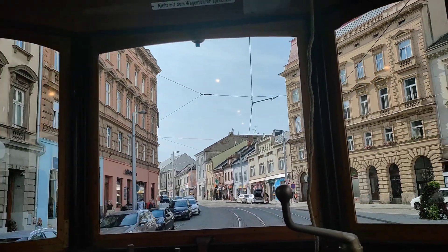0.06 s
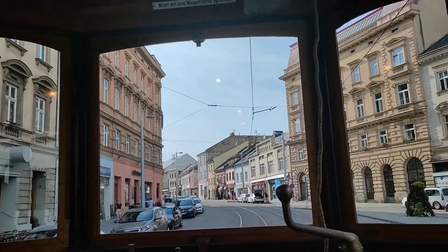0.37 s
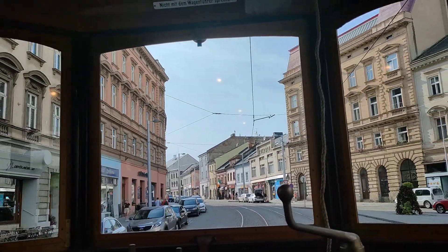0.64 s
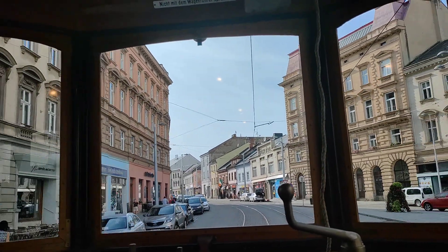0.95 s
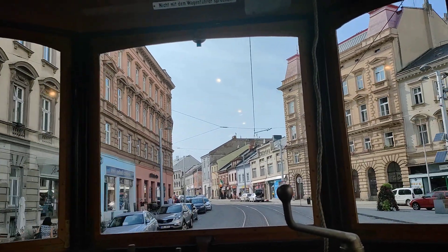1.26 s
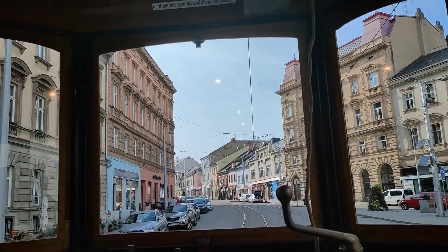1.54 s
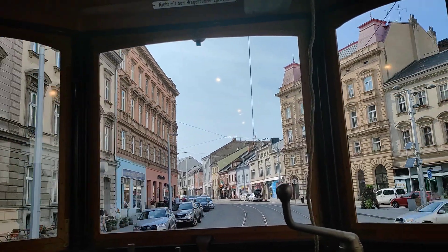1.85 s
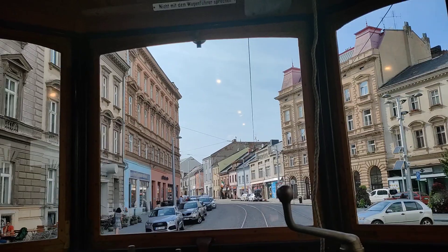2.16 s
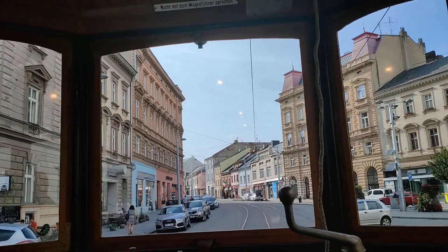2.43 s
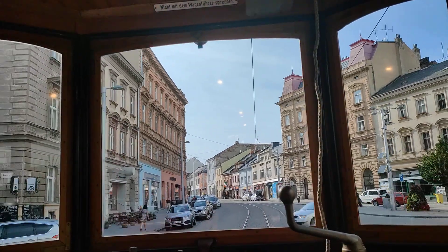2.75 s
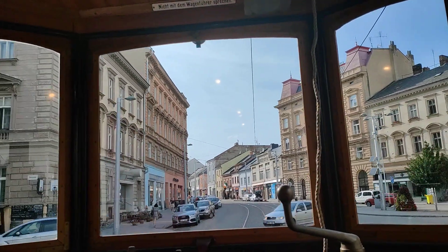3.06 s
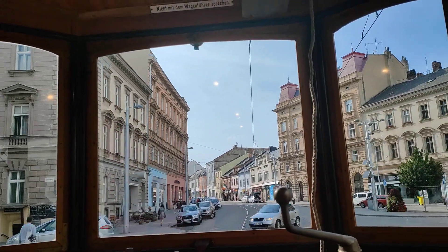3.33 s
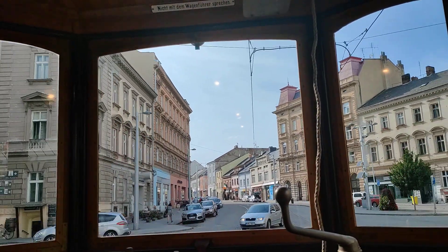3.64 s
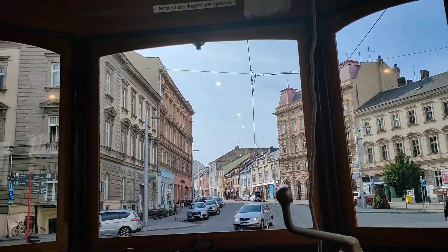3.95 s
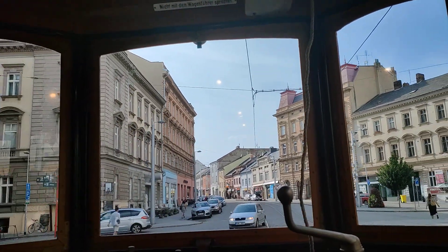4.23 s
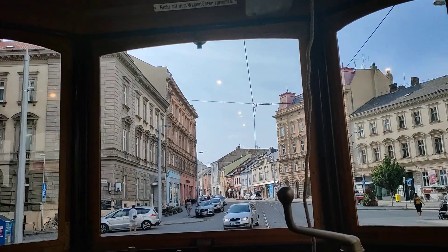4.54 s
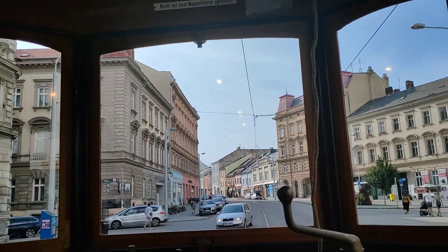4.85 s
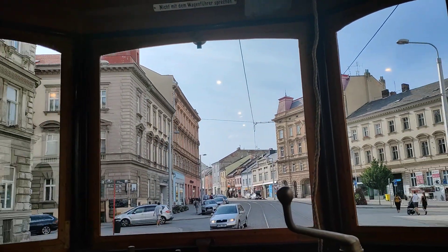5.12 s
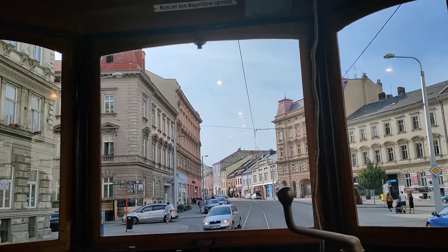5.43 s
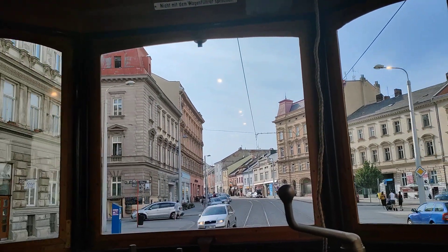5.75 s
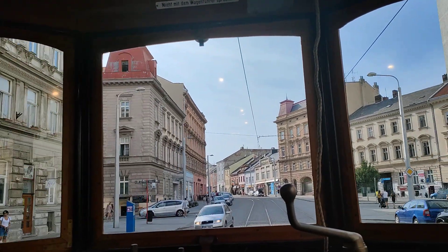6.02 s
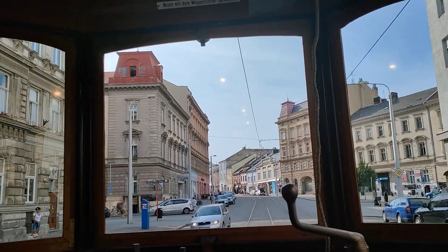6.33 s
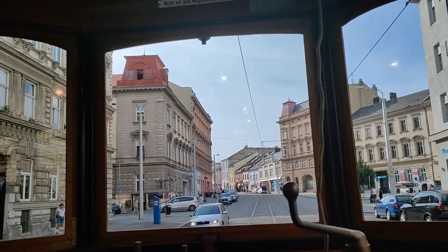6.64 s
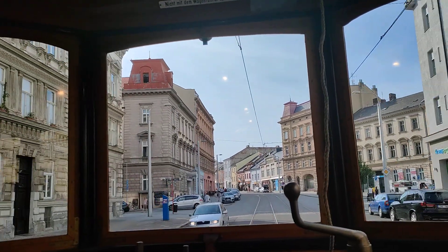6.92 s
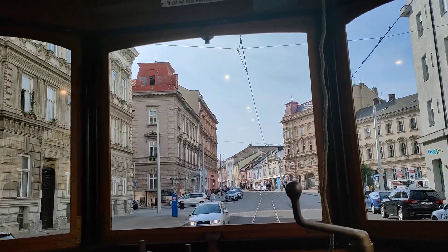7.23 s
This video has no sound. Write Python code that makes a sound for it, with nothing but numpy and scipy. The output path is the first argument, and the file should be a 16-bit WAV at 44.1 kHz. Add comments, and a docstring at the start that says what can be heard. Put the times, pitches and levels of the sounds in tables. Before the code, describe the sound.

Inside a moving tram, low wheel rumble and thumps run under rattling fittings, while a gear hum turns into whining chatter.

```python
"""Rumbling wheels, a booming body and humming gears: an old wooden tram on street rails, from the cab.
Loose frames and fittings rattle, harder at each wheel turn and track jolt, over a hiss of rolling steel.
Low thumps stand out of the rumble, metal parts buzz and rail joints clunk. Half way the drive slackens
and the gears whine and chatter; as the car slows, their hum sinks into a resonance of the body."""
import sys
import numpy as np
from scipy import signal
from scipy.fft import rfft, irfft
from scipy.io import wavfile
from scipy.ndimage import uniform_filter1d

SR = 44100
rng = np.random.default_rng(int(sys.argv[2]) if len(sys.argv) > 2 else 0)


def log_audio(samples):
    """Write samples as a 16-bit WAV file to the path given in sys.argv[1]."""
    # one column per channel
    frames = np.atleast_2d(samples).T
    # limit to full scale, then quantise
    limited = np.clip(frames, -1, 1)
    pcm = np.round(limited * 32767).astype(np.int16)
    wavfile.write(sys.argv[1], SR, pcm)


N = 329868
TIME = np.arange(N) / SR
FREQS = np.maximum(np.arange(N // 2 + 1) * SR / N, 1)

# Stereo width of the cab. Each row: frequency in Hz, left-right correlation.
CAB_LIKENESS = [(40, 0.6), (70, 0.5), (110, 1), (200, 0.78), (450, 0.85), (700, 0.6), (1000, 0.24),
                (1600, -0.05), (9000, 0.07)]
# Lean of the cab's stereo image. Each row: frequency in Hz, left minus right in dB.
CAB_BALANCE = [(40, 1.5), (100, 2), (200, -0.5), (450, 1), (800, -2.5), (1200, -2.5), (1800, -7),
               (3000, -6.5), (4200, 0), (5800, -5.5), (8000, 0.5), (13000, -4.5)]
# Tone colour of each noisy layer. Each row: frequency in Hz, relative level in dB.
RUMBLE_EQ = [(10, -17), (20, -9.5), (33, 4.5), (43, -3.5), (53, -3), (67, -2), (90, -6), (112, -11.5),
             (160, -18)]
BOOM_EQ = [(95, -12.5), (114, -5.5), (128, -1), (155, 0), (182, 0.5), (215, -4), (245, -10.5), (300, -14.5)]
ROAR_EQ = [(170, -17), (215, 5), (250, 4), (285, 2.5), (350, -2), (480, -2.5), (560, -4.5), (630, -4),
           (700, -9.5), (850, -10.5), (1050, -16.5), (3000, -27.5)]
WOODWORK_EQ = [(450, -19), (900, -0.5), (1350, 4), (1650, -8), (1950, -5), (2170, 2), (2500, -4),
               (3150, -0.5), (3600, -7), (4500, -11), (5700, -11), (6800, -15), (7400, -19.5), (8100, -40)]
CHATTER_EQ = [(500, -1.5), (950, -0.5), (1400, -3.5), (2000, -1.5), (2500, -1), (3150, -2), (3650, -7.5),
              (4450, -9.5), (4900, -10.5), (6300, -9), (7000, -12.5), (7500, -19), (8100, -39)]
FITTINGS_EQ = [(5000, 0), (7500, -4.5), (8300, -3.5), (9600, -1.5), (11000, -6.5), (12500, -10),
               (14500, -15)]
HISS_EQ = [(2800, -1.5), (3700, 3), (4500, -4.5), (6000, -1.5), (7000, -6), (7500, -14), (8100, -35)]
# Fader rides for undercarriage, body, wheels and rattle. Each row: time in seconds, relative level in dB.
RUMBLE_FADER = [(0, -26), (1.9, -26), (2.45, -24), (2.85, -21.5), (3.9, -23.5), (4.5, -23.5), (5.2, -23),
                (6.5, -22.5), (7.48, -24)]
BOOM_FADER = [(0, -18), (1.05, -17.5), (4.35, -25), (5.05, -22.5), (5.45, -25), (6.2, -21.5), (6.7, -25),
              (7.48, -26.5)]
ROAR_FADER = [(0, -23), (1.1, -25), (2.1, -22.5), (3, -25), (4.3, -22.5), (7.48, -24.5)]
RATTLE_FADER = [(0, -34), (1.15, -34.5), (1.9, -33.5), (3.05, -35.5), (3.5, -33), (3.9, -29.5), (4.7, -29),
                (5.15, -29), (5.8, -30), (6.6, -30), (7.48, -30.5)]
# Pitch of the meshing gears. Each row: time in seconds, teeth per second.
MESH_RATE = [(0, 204), (1.5, 208), (2.55, 213), (3.6, 216.5), (4.8, 212.3), (5.8, 207.8), (6.6, 204.5),
             (7.48, 201.3)]
# Slack in the gears. Each row: time in seconds, tooth chatter's share of the rattle from 0 to 1.
GEAR_SLACK = [(0, 0.16), (3.1, 0.25), (3.5, 0.65), (3.9, 1), (7.48, 0.87)]
# Gear harmonics 1 to 5. Each row: base level in dB under drive, the same when slack, pan left in dB.
GEAR_HARMONICS = [(-32.5, -28.5, 1), (-50.5, -36, 0.5), (-45, -38, -0.5), (-68, -44, -4.5), (-70, -50.5, 0)]
# A gear tone sings out. Each row: harmonic number, start and end in seconds, boost in dB.
GEAR_SURGES = [(1, 1.09, 2.1, 7), (1, 2.11, 2.55, 5), (1, 5.1, 5.8, 2.5), (1, 6.0, 6.4, 2),
               (1, 7.1, 7.48, 1.5), (2, 3.62, 4.06, 10.5), (2, 4.13, 4.43, 9.5), (2, 4.83, 4.99, 9),
               (2, 5.17, 5.85, 10), (2, 5.85, 6.4, 6), (2, 7.18, 7.48, 6.5), (3, 3.58, 3.93, 3.5),
               (3, 6.46, 6.95, 5.5), (3, 7.1, 7.3, 4.5), (4, 4.74, 4.9, 5), (4, 6.75, 7.4, 5.5)]
# Body resonances that lift nearby gear tones. Each row: centre in Hz, width in Hz, boost in dB.
BODY_MODES = [(201.8, 5.4, 9), (652.5, 9.1, 6), (829, 41, 6.5), (1011, 18, 12)]
# Ring of the gear wheels. Each row: centre in Hz, width in Hz, boost in dB.
GEAR_MODES = [(1457, 45, 6.5), (1752, 37, 8), (4890, 98, 6)]
# Track jolts. Each row: centre and length in seconds, rattle boost in dB, shiver of the fittings in dB.
TRACK_JOLTS = [(0.313, .08, 1, -57), (0.77, .04, 0.5, -56), (0.93, 0.04, 2.5, -66), (1.418, 0.03, 4, -52),
               (1.603, 0.05, 2, -64), (1.834, 0.064, 2.5, -51), (2.215, 0.046, 0.5, -56),
               (2.293, 0.075, 3, -66), (2.448, 0.035, 5, -66), (2.62, .05, 2.5, -63),
               (2.88, .035, -0.5, -56), (3.092, 0.02, 4, -62), (3.23, 0.033, 1, -55),
               (3.31, .035, 2.5, -65), (3.653, 0.061, 3.5, -53), (3.933, 0.078, 4, -55),
               (4.21, 0.079, 1, -57), (4.29, 0.066, 3, -52), (4.46, 0.095, 1, -60),
               (4.602, 0.023, 1.5, -57), (4.87, 0.06, -1.2, -55), (4.998, 0.02, -0.5, -59),
               (5.065, 0.04, 0, -54), (5.344, 0.06, 1, -56), (5.63, 0.12, 2.5, -64), (5.96, 0.04, 0.5, -56),
               (6.075, 0.03, 0, -59), (6.34, .08, 1.5, -64), (6.79, 0.15, 1.3, -64), (7.0, 0.033, 1, -55),
               (7.367, 0.067, 2, -64)]
# The whole frame shudders. Each row: start and end in seconds, rattle boost in dB.
FRAME_SHUDDERS = [(0.66, 0.796, 2.8), (4.76, 5.03, 3), (5.928, 6.1, 2.5), (6.73, 6.85, 1.6)]
# Low thumps and booms in the rumble. Each row: start in seconds, pitch in Hz, peak in dB.
LOW_THUMPS = [(0.082, 51.5, -16.5), (0.18, 193.4, -12.5), (0.345, 66, -16), (0.45, 49.7, -14.5),
              (0.539, 49.6, -19), (0.68, 46, -20), (0.772, 178, -17), (1.008, 61.7, -18),
              (1.148, 48.7, -18), (1.25, 59, -15.5), (1.68, 55.7, -19), (1.98, 210.7, -14),
              (2.009, 60, -16.5), (2.33, 66.5, -15.5), (2.598, 78.7, -12), (2.736, 68, -13),
              (2.84, 57, -23.5), (2.945, 205, -16.5), (2.955, 64, -14.5), (3.098, 64.6, -13),
              (3.475, 40.6, -12.5), (3.761, 64, -14.5), (4.051, 32.5, -13), (4.599, 42.7, -17),
              (5.01, 164, -18), (5.367, 65.3, -11), (5.808, 188.5, -20), (6.13, 151, -16), (6.27, 49, -18),
              (6.42, 41, -12), (6.918, 46, -16), (7.07, 52.3, -17)]
# Buzzing metal parts. Each row: centre and length in seconds, pitch and bandwidth in Hz, level in dB.
METAL_BUZZES = [(0.307, .07, 3500, 500, -41), (.76, 0.065, 906, 100, -36), (.72, 0.065, 2400, 120, -41),
                (0.757, .05, 3550, 300, -42), (0.93, 0.052, 2700, 130, -40), (.94, 0.055, 3400, 90, -44),
                (1.62, 0.067, 3090, 520, -35), (1.88, .07, 2330, 60, -40), (2.46, 0.045, 1760, 90, -38),
                (3.94, .055, 2000, 1400, -33), (4.9, .14, 2600, 1000, -39), (6.0, .08, 2500, 900, -40),
                (6.8, 0.071, 2600, 900, -37)]
# A wheel crosses a rail joint. Each row: start in seconds, level in dB.
JOINT_CLUNKS = [(0.76, -18), (1.81, -19), (2.275, -19), (2.585, -13.5), (2.826, -16), (3.08, -26),
                (3.106, -20.5), (3.66, -14.5), (4.365, -19), (5.785, -15)]
# Ring of the wheel truck. Each row: pitch in Hz, relative level in dB, seconds to fall by 60 dB.
TRUCK_MODES = [(300, -1, 0.076), (368, -5.5, 0.066), (448, -2, 0.048), (520, -7, 0.046), (617, -6, 0.095),
               (643, -4, 0.1), (756, -11, .06), (1035, -14, .06), (1400, -16, .05)]


def from_db(db):
    """Decibels to gain."""
    return 10 ** (np.asarray(db) / 20)


def pan(db):
    """Stereo gains with the left side db above the right."""
    return from_db(db * np.array([[.5], [-.5]]))


def unit_rms(x):
    """Scale to an rms of 1."""
    return x / np.sqrt(np.mean(x ** 2) + 1e-20)


def over_time(points):
    """A time curve at every sample."""
    return np.interp(TIME, *np.transpose(points))


def over_hz(points):
    """A frequency curve at every bin."""
    hz, value = np.transpose(points)
    return np.interp(np.log(FREQS), np.log(hz), value)


def resonance(hz, centre, width):
    """A resonant peak of height 1."""
    return 1 / (1 + (2 * (hz - centre) / width) ** 2)


def drift(rate_hz):
    """A slow random wander with rms 1."""
    return unit_rms(irfft(rfft(rng.standard_normal(N)) / (1 + (FREQS / rate_hz) ** 2), N))


def noise():
    """Two unrelated white noises."""
    return rng.standard_normal((2, N))


def swell(centre, length):
    """A smooth bump of height 1."""
    return np.exp(-2 * np.minimum(((TIME - centre) / length) ** 2, 20))


def held(start, end, fade_s=0.016):
    """Fade in, hold at 1, fade out."""
    return np.clip(.5 + np.minimum(TIME - start, end - TIME) / fade_s, 0, 1)


def steady(x, seconds):
    """Even out a vibration's level over the given time."""
    return x / np.sqrt(uniform_filter1d(np.mean(x ** 2, axis=0), int(seconds * SR)) + 1e-9)


def in_cab(pair, eq, modes=(), left_lead_ms=0):
    """Colour two unrelated signals and spread them across the cab; the mono mix has rms 1."""
    gain = from_db(over_hz(eq) + sum(db * resonance(FREQS, hz, width) for hz, width, db in modes))
    low_hz, high_hz = eq[0][0], eq[-1][0]
    gain *= np.minimum(FREQS / low_hz, 1) ** 2 * np.minimum(high_hz / FREQS, 1) ** 4
    alike = np.clip(over_hz(CAB_LIKENESS), -.99, .99)
    mid, side = rfft(pair) * gain * np.sqrt([1 + alike, 1 - alike])
    tilt = from_db(over_hz(CAB_BALANCE) / 2)
    early = np.exp(2j * np.pi * FREQS * left_lead_ms / 1000)   # a source on the left arrives there first
    out = irfft(np.array([(mid + side) * tilt * early, (mid - side) / tilt]), N)
    return out / np.std(out.mean(axis=0))


def running_gear(sway_db):
    """Rail roughness makes the undercarriage rumble, the hollow body boom and the wheels roar."""
    rumble = from_db(over_time(RUMBLE_FADER) + 3) * steady(in_cab(noise(), RUMBLE_EQ), seconds=0.113)
    boom = from_db(over_time(BOOM_FADER) - 0.5) * steady(in_cab(noise(), BOOM_EQ), seconds=0.14)
    roar_db = over_time(ROAR_FADER) + 0.59 * sway_db
    roar = from_db(roar_db) * steady(in_cab(noise(), ROAR_EQ, left_lead_ms=0.011), seconds=0.17)
    return rumble + boom + roar


def gear_whine(mesh_hz, wobble=0.003, flutter_db=1.2, blur=0.1):
    """Meshing teeth sing, brighter when slack; uneven teeth make each harmonic flutter."""
    cycles = np.cumsum(mesh_hz * (1 + wobble * drift(7.5))) / SR
    slack = over_time(GEAR_SLACK)
    out = 0
    for k, (driven_db, slack_db, pan_db) in enumerate(GEAR_HARMONICS, 1):
        body_db = sum(db * resonance(k * mesh_hz, hz, width) for hz, width, db in BODY_MODES)
        surge_db = sum(db * held(start, end) for harmonic, start, end, db in GEAR_SURGES if harmonic == k)
        level_db = driven_db + slack * (slack_db - driven_db) + body_db + surge_db
        # changing paths through the flexing body blur the high tones most
        shared_flex = drift(12) + 1j * drift(24)
        side_flex = np.array([drift(8.5) + 1j * drift(12) for side in range(2)])
        paths = 1 + blur * k * (.8 * shared_flex + .6 * side_flex)
        tone = unit_rms(np.real(paths * np.exp(2j * np.pi * k * cycles)))
        out += tone * from_db(level_db + flutter_db * drift(18)) * pan(pan_db)
    return out


def wheel_bumps(mesh_hz, teeth_per_turn=75, offset_turns=.98, length_s=0.053):
    """An uneven wheel shakes the car: a smooth bump of height 1 on every turn."""
    turns = np.cumsum(mesh_hz) / SR / teeth_per_turn - offset_turns
    from_bump_s = (turns - np.round(turns)) * teeth_per_turn / mesh_hz
    return np.exp(-2 * (from_bump_s / length_s) ** 2)


def knocks(per_s, spread_db, t60, crack):
    """Random knocks of uneven strength, each a sharp crack with a noisy tail."""
    hits = rng.random(N) < per_s / SR
    energy = hits * from_db(spread_db * np.minimum(rng.exponential(1, N), 3)) ** 2
    age = TIME[:SR // 4]
    decay = from_db(-60 * age / t60) + crack * np.exp(-age / 0.0015)
    power = np.maximum(signal.fftconvolve(energy, decay ** 2), 0)
    power[:len(age) - 1] += power[N:]   # wrap the tails, so the scene opens already ringing
    return unit_rms(np.sqrt(power[:N]) * noise())


def loose_parts(per_s, spread_db, t60, crack=1.6, mode_spacing_hz=30, ripple_db=1.8):
    """Parts of four sizes knock independently, each in its own band with its own close resonances."""
    bands = np.array([np.exp(-2 * np.log2(FREQS / hz) ** 2) + 1e-9 for hz in np.geomspace(1000, 6000, 4)])
    mode_hz = np.arange(0, SR / 2, mode_spacing_hz)
    out = 0
    for share in bands / bands.sum(axis=0):
        ripple = from_db(np.interp(FREQS, mode_hz, rng.normal(0, ripple_db, len(mode_hz))))
        out += np.sqrt(share) * ripple * rfft(knocks(per_s, spread_db, t60, crack))
    return irfft(out, N)


def rattle(mesh_hz, sway_db, clump_db=2.1, tooth_depth=0.82):
    """Loose woodwork rattles in clumps; slack gear teeth chatter in step with the mesh."""
    slack = over_time(GEAR_SLACK)
    clumps = from_db(clump_db * drift(14))
    taps = loose_parts(700 * clumps, spread_db=2.8, t60=.19)
    tooth_pulse = 1 + tooth_depth * np.cos(2 * np.pi * np.cumsum(mesh_hz) / SR)
    slaps = loose_parts(1300 * tooth_pulse * clumps, spread_db=2.7, t60=.17)
    woodwork = np.sqrt(1 - slack) * in_cab(taps, WOODWORK_EQ, left_lead_ms=0.31) * from_db(-2.5)
    chatter = np.sqrt(slack) * in_cab(slaps, CHATTER_EQ, GEAR_MODES, left_lead_ms=0.095) * from_db(-2)
    return from_db(over_time(RATTLE_FADER) + sway_db) * (woodwork + chatter)


def fittings(sway_db, bumps, rest_db=-58, slack_lift_db=1.5, bump_db=-64):
    """Panes and small fittings tick all the time and shiver at each wheel bump and jolt."""
    power = from_db(rest_db + 0.41 * sway_db + slack_lift_db * over_time(GEAR_SLACK)) ** 2
    power += (from_db(bump_db) * bumps) ** 2
    power += sum((from_db(db) * swell(at, length)) ** 2 for at, length, _, db in TRACK_JOLTS)
    ticks = knocks(900, spread_db=4.2, t60=0.2, crack=1)
    return np.sqrt(power) * in_cab(ticks, FITTINGS_EQ)


def rail_hiss(level_db=-49):
    """Steel rolling on steel hisses evenly under the rattles."""
    return from_db(level_db) * in_cab(noise(), HISS_EQ)


def low_thumps(rise_s=0.019):
    """Low thumps and booms stand out of the rumble, each a tone that swells and quickly dies."""
    out = 0
    for start, hz, db in LOW_THUMPS:
        age = np.maximum(TIME - start, 0)
        envelope = age / rise_s * np.exp(1 - np.minimum(age / rise_s, 20))
        out += from_db(db) * envelope * np.sin(2 * np.pi * hz * age)
    return out * pan(db=3.5)


def metal_buzzes():
    """Shaken metal parts ring briefly around their own pitch: narrow bands jingle, broad ones scrape."""
    out, shaking = 0, rfft(noise())
    for at, length, hz, width, db in METAL_BUZZES:
        ring = irfft(shaking * resonance(FREQS, hz, width), N)
        out += from_db(db) * swell(at, length) * steady(ring, length)
    return out * pan(db=-7)


def joint_clunks(contact_s=0.0019, spread_db=1):
    """Each rail joint strikes the wheel truck, every mode ringing with a strength of its own."""
    out, age = np.zeros(N + SR), TIME[:SR // 3]
    attack = 1 - np.exp(-age / contact_s)
    for at, db in JOINT_CLUNKS:
        start = int(at * SR)
        for hz, mode_db, t60 in TRUCK_MODES:
            strike_db = db + mode_db + spread_db * rng.standard_normal()
            envelope = attack * from_db(strike_db - 60 * age / t60)
            out[start:start + len(age)] += envelope * np.sin(2 * np.pi * (hz * age + rng.random()))
    return out[:N] * pan(db=-1.5)


def scene():
    """The mix in the cab; bumps, jolts and shudders push up the roar, rattle and fittings together."""
    mesh_hz = over_time(MESH_RATE)
    bumps = wheel_bumps(mesh_hz)
    sway_db = 0.5 * bumps + sum(db * swell(at, length) for at, length, db, _ in TRACK_JOLTS)
    sway_db += sum(db * held(start, end) for start, end, db in FRAME_SHUDDERS)
    bed = running_gear(sway_db) + gear_whine(mesh_hz)
    texture = rattle(mesh_hz, sway_db) + fittings(sway_db, bumps) + rail_hiss()
    return bed + texture + low_thumps() + metal_buzzes() + joint_clunks()


def record(dry, cutoff_hz=14900):
    """A steep low-pass takes off the very top."""
    return signal.sosfilt(signal.ellip(10, .1, 80, cutoff_hz, fs=SR, output="sos"), dry)


dry = scene()
out = record(dry)
log_audio(out)
```